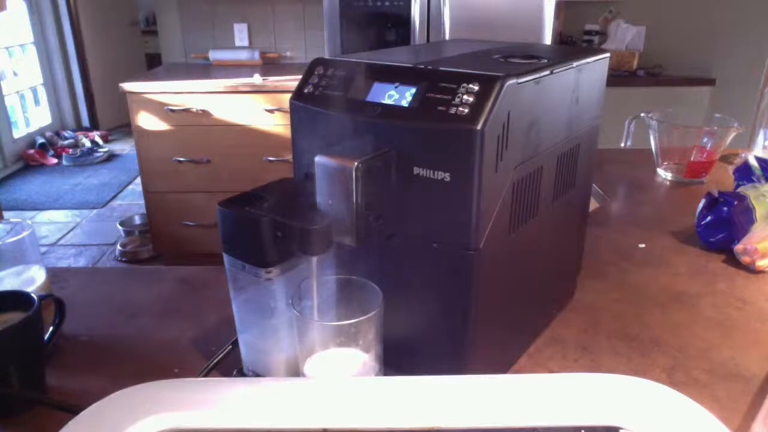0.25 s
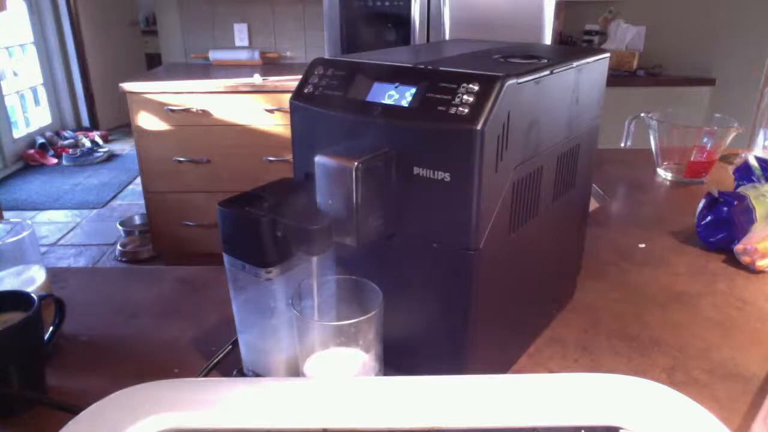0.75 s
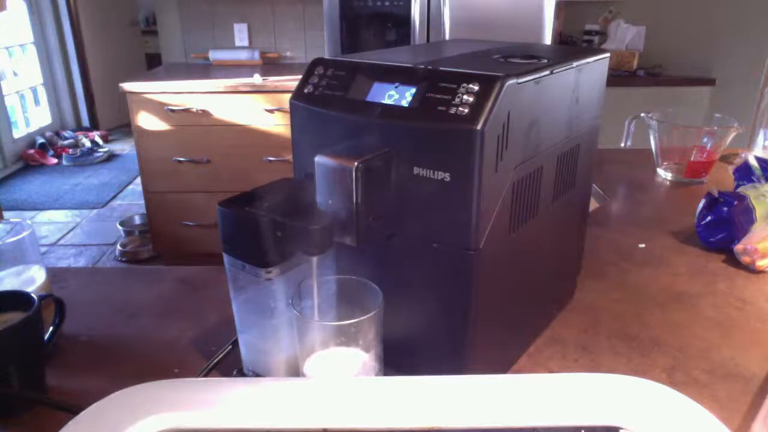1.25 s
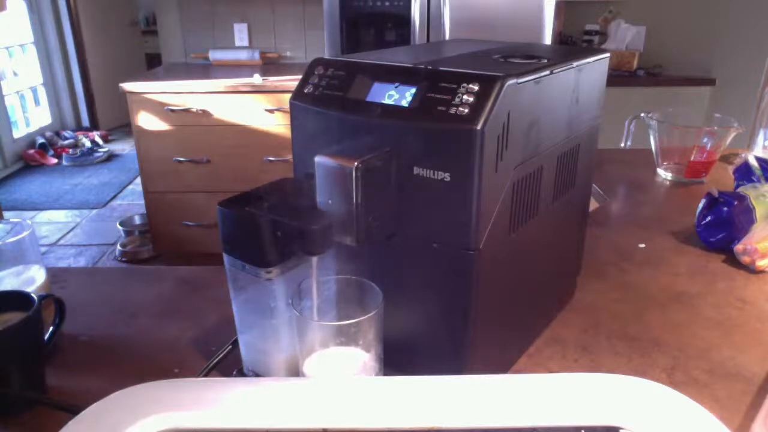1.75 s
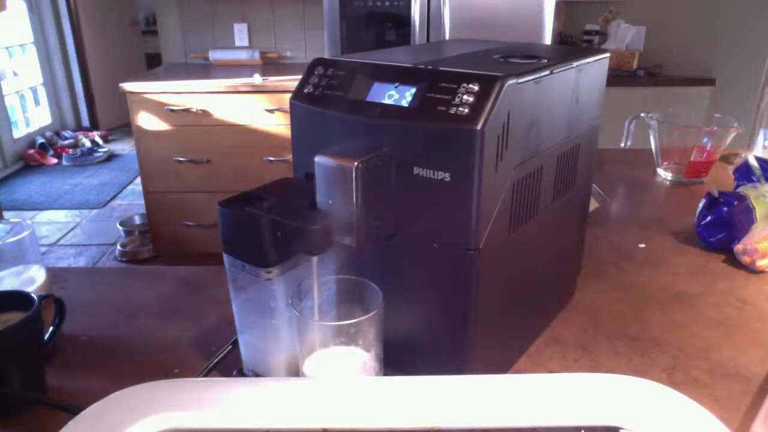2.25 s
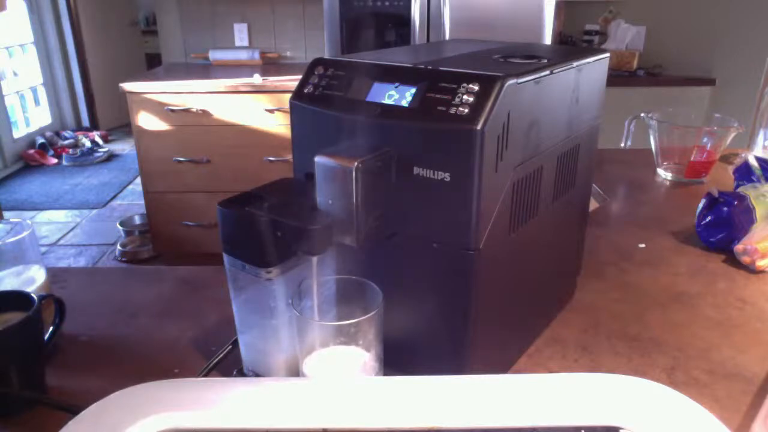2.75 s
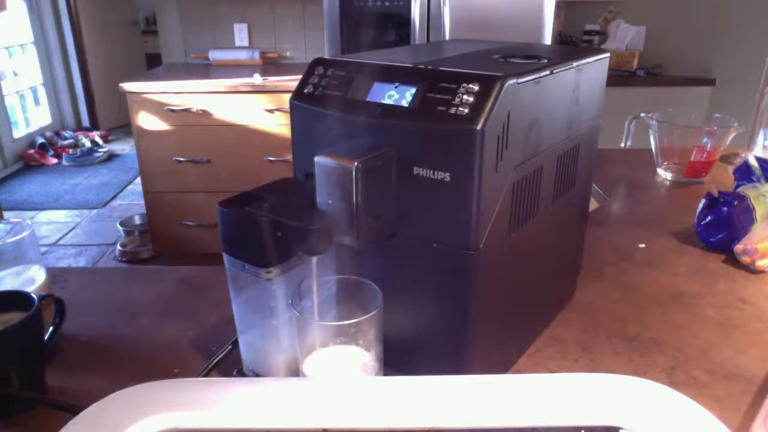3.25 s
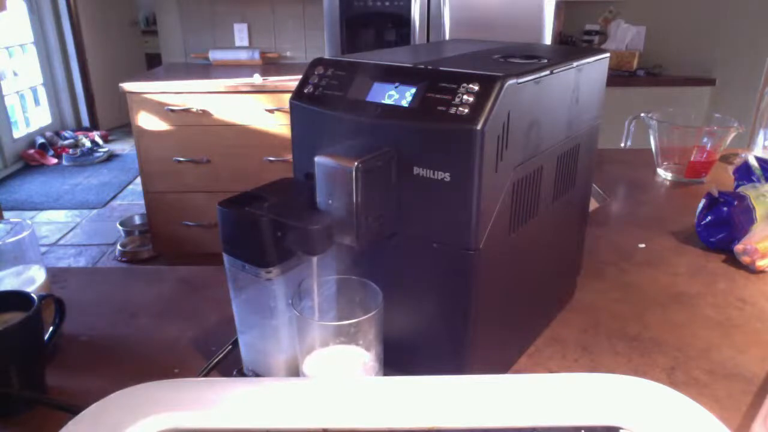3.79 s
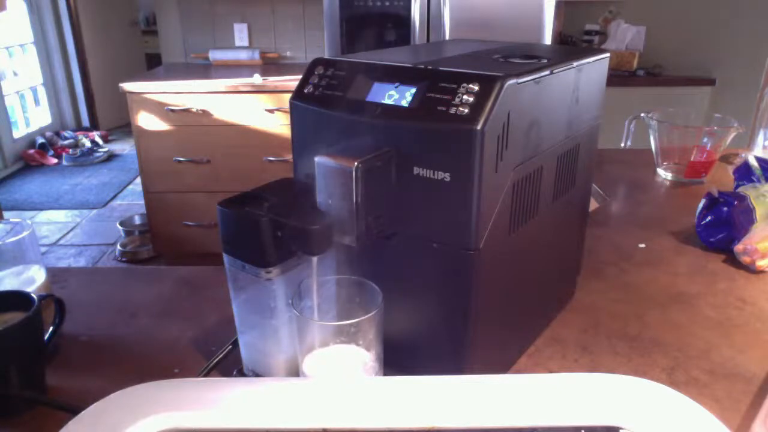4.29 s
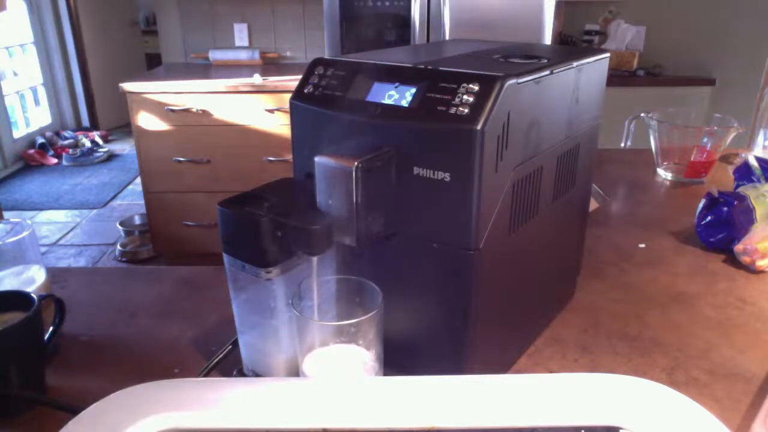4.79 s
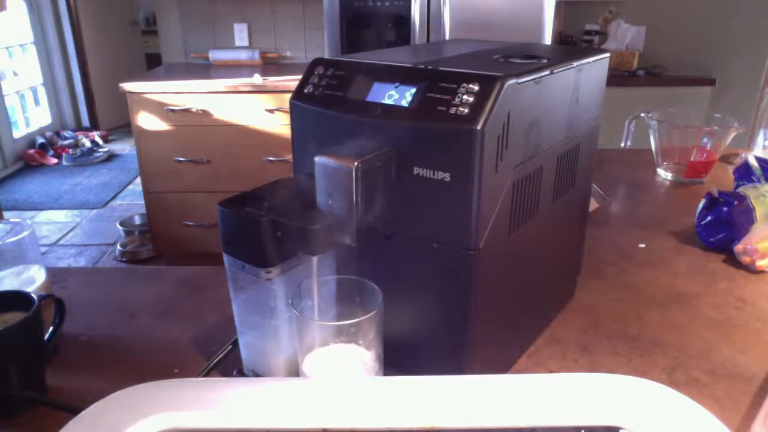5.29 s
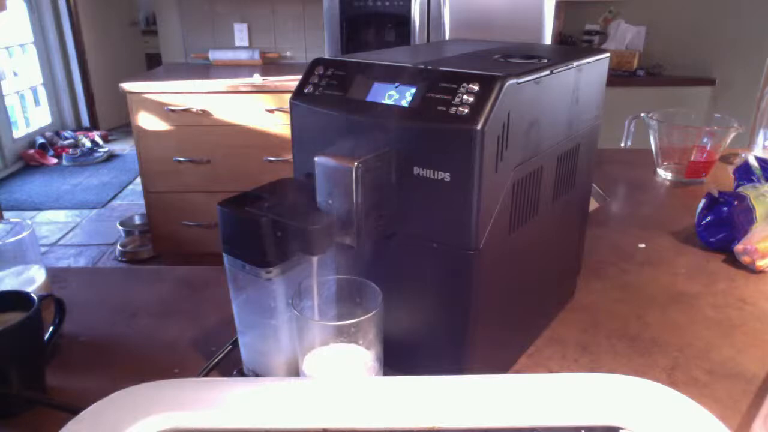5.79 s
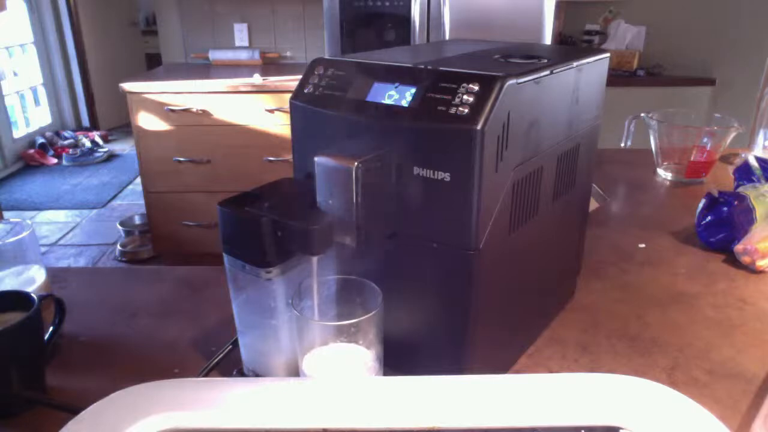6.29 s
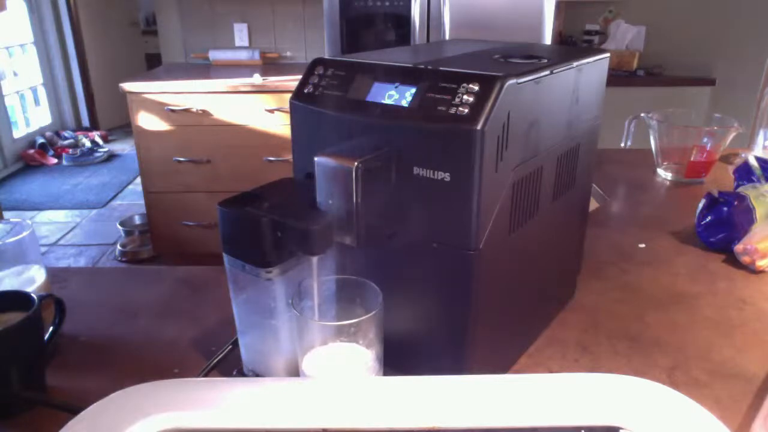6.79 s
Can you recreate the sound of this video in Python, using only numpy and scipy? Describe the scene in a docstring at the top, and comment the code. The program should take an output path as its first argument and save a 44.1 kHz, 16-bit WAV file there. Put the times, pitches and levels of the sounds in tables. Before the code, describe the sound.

Close in a small kitchen, an automatic coffee machine froths milk with a loud, dense steam roar centred in the upper mids, edged with rasp and sizzle. After about four seconds it eases, sputtering and choking, down to a much quieter, pulsing hiss. Milk gurgles faintly and a pump thuds softly three times a second.

```python
"""On a kitchen counter, an automatic coffee machine froths milk into a glass; the room answers briefly.
A noise jet and uneven kicks ring the frother's chamber as a roar, and rasp and sizzle at the spout.
Rising bubble tones gurgle in the milk and crackle in its foam. As the jet eases, it sputters more.
Behind it the water pump feeds the boiler: three soft thuds a second, buzzing through the casing."""
import sys
import numpy as np
from scipy import signal
from scipy.fft import rfft, irfft, next_fast_len
from scipy.io import wavfile
from scipy.ndimage import uniform_filter1d, map_coordinates

SR = 44100
rng = np.random.default_rng(int(sys.argv[2]) if len(sys.argv) > 2 else 0)


def generate_wav(sig):
    """Save sig (samples, or channels by samples) to the path in sys.argv[1] as 16-bit PCM at SR."""
    pcm = np.round(np.clip(np.atleast_2d(sig).T, -1, 1) * 32767).astype(np.int16)
    wavfile.write(sys.argv[1], SR, pcm)


N = 310464  # samples

# strength of the steam jet, heard as the chamber's roar: time_s [s], level_db [dB]
JET_STRENGTH = [(0, -15), (1.9, -17), (3.95, -18), (4.6, -20), (5.1, -23.5), (5.6, -27.5), (6.3, -29.5),
                (7.04, -31.5)]
# milk briefly blocks the jet, roar and spray change: centre_s [s], roar_change_db [dB], spray_change_db [dB]
MILK_CHOKES = [(4.335, -4, 0.5), (4.75, -6, 0.5), (5.285, -3.5, 1), (5.595, -5.5, 0), (5.77, -7, 2),
               (5.86, -3, 1), (6.6, 1.5, -1.5), (6.99, -4, -1)]
# spurts of steam through the chamber: centre_s [s], level_db [dB]
STEAM_SPURTS = [(4.385, -18), (4.7, -21), (5.05, -19), (5.35, -22), (5.675, -27.5), (5.725, -25.5),
                (5.81, -26.5), (5.935, -27.5), (6.12, -30), (6.41, -29.5), (6.775, -29)]
CHOKE_HALF_S, SPURT_HALF_S = 0.022, 0.02  # half the length of a choke and of a spurt
# the chamber's main resonance: pitch at rest, octaves that a surge of milk lowers it
THROAT_HZ, FLOOD_OCTAVES = 1624, 0.1
# what a surge adds to each sound when the jet is weak; a stronger jet hides it
ROAR_SURGE_DB, RASP_SURGE_DB, SIZZLE_SURGE_DB, GURGLE_SURGE_DB = 2, 0.5, 1.5, 1


def chamber(sputter, kicks, surge):
    """The jet and its collapsing pockets ring the chamber; a weak jet surges, chokes and spurts."""
    jet_db, = curves(JET_STRENGTH)
    choke_db = sum(db * bump(s, CHOKE_HALF_S) for s, db, _ in MILK_CHOKES)
    roar_db = jet_db + ROAR_SURGE_DB * surge + choke_db
    source = blend(jet(), kicks, 0.65 * sputter)
    ring = kitchen(frother(source, lo_hz=1241, hi_hz=2660), wet_db=-9.5)
    # each surge floods the chamber, and the jet tosses the milk level about quickly
    throat_hz = THROAT_HZ * 2 ** (-FLOOD_OCTAVES * surge + 0.12 * wobble(14))
    roar = churned(ring, patchy_db=0.77 + 3.8 * sputter,
                   centre_hz=throat_hz, octaves=0.072, lift_db=1.0 + 10 * sputter)
    # a steady jet wavers slowly, a sputtering one fast
    flutter_db = 1.1 * sputter * wobble(30) + 0.5 * (1 - sputter) * wobble(10)
    return np.hypot(amp(roar_db + flutter_db), puffs(STEAM_SPURTS, SPURT_HALF_S)) * roar


# large steam pockets bursting in the chamber: start_s [s], kick_db [dB, relative: see pops]
POCKET_BURSTS = [(5.045, -13), (6.774, -18.5)]


def pops():
    """A large pocket gives the chamber one hard kick."""
    kicks = np.zeros(N)
    for start_s, kick_db in POCKET_BURSTS:
        kicks[int(start_s * SR)] = amp(kick_db)
    ring = frother(kicks, lo_hz=1300, hi_hz=1860)
    # before the room, the loudest ring peaks 3 dB above the strongest kick
    peak = amp(3) * kicks.max()
    return kitchen(peak * ring / np.abs(ring).max(), wet_db=-11)


# the spray leaving the spout: time_s [s], rasp_db [dB], sizzle_db [dB]
SPOUT_SPRAY = [(0, -29.7, -24.5), (.7, -31, -28), (1.7, -30.5, -29), (2.1, -33, -31.5), (2.7, -35, -31),
               (3.15, -39, -35), (3.5, -34, -31.5), (4.35, -36, -31.5), (4.85, -42, -36), (5.35, -41, -40),
               (6.1, -46.5, -39.5), (7.04, -48, -49.5)]
# wet splutters at the spout: centre_s [s], rasp_db [dB], sizzle_db [dB], half_length_s [s]
WET_SPLUTTERS = [(2.604, -47, -29, 0.039), (4.07, -50, -33, 0.054), (4.26, -39, -27.5, 0.1),
                 (4.51, -55, -31, .035), (4.627, -36.5, -46, 0.047), (5.08, -37.5, -38, 0.077),
                 (5.48, -44, -38.5, .06), (5.96, -44, -44, 0.063), (6.07, -57, -46, 0.058),
                 (6.82, -43, -61, 0.028)]
# the sizzle's wandering band: its centre, and how much a splutter sharpens it
SIZZLE_HZ, SPLUTTER_LIFT_DB = 5240, 6


def spout_levels(surge):
    """Rasp and sizzle in dB from spray, surges, chokes, splutters; and the splutters' share of the sizzle."""
    rasp_db, sizzle_db = curves(SPOUT_SPRAY)
    choke_db = sum(db * bump(s, CHOKE_HALF_S) for s, _, db in MILK_CHOKES)
    wet_rasp = sum(amp(db) * bump(s, half_s) for s, db, _, half_s in WET_SPLUTTERS)
    wet_sizzle = sum(amp(db) * bump(s, half_s) for s, _, db, half_s in WET_SPLUTTERS)
    rasp = np.hypot(amp(rasp_db + RASP_SURGE_DB * surge), wet_rasp)
    sizzle = np.hypot(amp(sizzle_db + SIZZLE_SURGE_DB * surge), wet_sizzle)
    wetness = wet_sizzle / sizzle
    return 20 * np.log10(rasp) + choke_db, 20 * np.log10(sizzle) + choke_db, wetness


def spout(sputter, kicks, surge):
    """Wet steam rasps through the spout and sizzles at its lip in a wandering band."""
    rasp_db, sizzle_db, wetness = spout_levels(surge)

    rasp_source = blend(jet(), kicks, 0.18 * sputter)
    rasp = kitchen(frother(rasp_source, lo_hz=2745, hi_hz=4440), wet_db=-9.5)
    rasp = walls(rasp, share=0.097, reach_s=0.008)
    rasp = churned(rasp, patchy_db=0.4 + 6.6 * sputter, size=(4, 9))

    chirps = bubbles(rate=900, lo_hz=4443, hi_hz=7400, cycles=48, rise=0.019, spread_db=5.5)
    sizzle_source = blend(jet(), chirps, 0.25 * sputter)
    sizzle = kitchen(frother(sizzle_source, lo_hz=4370, hi_hz=7170), wet_db=-9.0)
    sizzle = walls(sizzle, share=0.091, reach_s=0.008)
    # splutters hold the band still and sharpen it
    centre_hz = SIZZLE_HZ * np.exp(0.15 * (1 - wetness) * wobble(12))
    lift_db = 5.8 * sputter + SPLUTTER_LIFT_DB * wetness
    sizzle = churned(sizzle, patchy_db=1.5 + 2.9 * sputter, size=(4, 8),
                     centre_hz=centre_hz, octaves=0.15, lift_db=lift_db)

    rasp_gain = amp(rasp_db + (0.83 + 2 * sputter) * wobble(20))
    sizzle_gain = amp(sizzle_db + 0.88 * sputter * wobble(20))
    return rasp_gain * rasp + sizzle_gain * sizzle


# brief whistles of steam at the lip of the spout: centre_s [s], level_db [dB]
LIP_WHISTLES = [(5.24, -34.5), (5.755, -38), (5.935, -30), (6.04, -37), (6.37, -32.5), (6.51, -39)]


def whistles():
    """For a moment the lip of the spout rings at its own pitch: a narrow band of steam noise."""
    tone = unit(coloured(jet(), lambda hz: band(hz, lo_hz=4780, hi_hz=4780, order=36)))
    return puffs(LIP_WHISTLES, half_s=0.015) * tone


# big glugs in the milk: centre_s [s], level_db [dB], pitch_hz [Hz], half_length_s [s]
MILK_GLUGS = [(2.85, -44, 800, .07), (3.566, -39.5, 600, .04), (3.76, -39, 740, 0.051),
              (3.857, -46, 1020, 0.051), (4.402, -47, 650, 0.055), (6.12, -51, 600, .04),
              (6.39, -45, 496, 0.087)]
# bubbling under the surface: level at full froth, dB per dB of froth
GURGLE_DB, GURGLE_FOLLOWS = -33.5, 1.04
# muffling as the glass fills, pitch of the jet's hollow
MUFFLE_DB_PER_S, HOLLOW_HZ = 0.81, 723


def gurgle(sputter, surge):
    """Big bubbles ring in the hollow under the jet, and the churning milk rumbles faintly."""
    froth_db, = curves(MILK_FROTH)
    muffle_db = MUFFLE_DB_PER_S * np.arange(N) / SR
    steady_db = GURGLE_DB + GURGLE_FOLLOWS * (froth_db - froth_db.max()) - muffle_db
    gurgle_db = steady_db + GURGLE_SURGE_DB * surge + 3.0 * sputter * wobble(11)
    # the hollow wanders in pitch; a big glug pulls it towards its own
    pull = sum(np.log(hz / HOLLOW_HZ) * bump(s, half_s) for s, _, hz, half_s in MILK_GLUGS)
    hollow_hz = HOLLOW_HZ * np.exp(0.059 * wobble(10) + pull)
    swell = sum(amp(db) * bump(s, half_s) for s, db, _, half_s in MILK_GLUGS)

    glugs = bubbles(rate=220, lo_hz=428.8, hi_hz=1145, cycles=17.1, rise=0.118, spread_db=3.5)
    ring = kitchen(frother(blend(jet(), glugs, 0.077), lo_hz=368, hi_hz=1180), wet_db=-6.5)
    ring = churned(ring, patchy_db=0.2 + 4.3 * sputter,
                   centre_hz=hollow_hz, octaves=0.76, lift_db=1.5 + 17.0 * sputter)

    def low_milk(hz):
        return band(hz, lo_hz=255, hi_hz=5000, order=2) * band(hz, lo_hz=25, hi_hz=436, order=5)

    rumble = unit(coloured(jet(), low_milk))
    # only a strong, steady jet stirs the whole glass
    rumble_db = gurgle_db - 14.5 - 9.7 * sputter + 1.2 * wobble(22.15)
    return np.hypot(amp(gurgle_db), swell) * ring + amp(rumble_db) * rumble


# how hard the milk is whipped, heard as the fizz of its foam: time_s [s], level_db [dB]
MILK_FROTH = [(0, -36.5), (.9, -37.5), (1.72, -37.5), (1.96, -42), (2.06, -42), (2.65, -42.5), (3.2, -45),
              (3.75, -43.5), (4.4, -43), (4.7, -45), (6.4, -48), (7.04, -49)]
# puffs of fine droplets: centre_s [s], level_db [dB]
DROPLET_SPITS = [(1.5, -45), (3.8, -39), (5.925, -45), (6.125, -49)]


def foam(sputter, kicks):
    """Tiny bubbles burst in the foam under a mist of droplets, with a few sharper spits."""
    fizz_db, = curves(MILK_FROTH)
    crackle = bubbles(rate=1500, lo_hz=6800, hi_hz=15100, cycles=2.5, rise=0.05, spread_db=25)
    mist = blend(jet(), kicks, 0.03 * sputter)
    fizz = kitchen(frother(blend(mist, crackle, 0.11), lo_hz=7790, hi_hz=17600), wet_db=-8.5)
    fizz = walls(fizz, share=0.047, reach_s=0.0083)
    fizz = churned(fizz, patchy_db=1.5 + 1.5 * sputter, size=(12, 6))
    spray = unit(coloured(jet(), lambda hz: band(hz, lo_hz=10500, hi_hz=15500, order=5)))
    fizz_gain = amp(fizz_db + 0.75 * wobble(60) + 0.34 * wobble(10))
    return fizz_gain * fizz + puffs(DROPLET_SPITS, half_s=0.017) * spray


# the pump's beat: time of the first stroke, strokes a second
FIRST_STROKE_S, STROKES_PER_S = 0.023, 3
# a stroke's level at full steam, its dB per dB of the jet, its scatter
STROKE_DB, STROKE_FOLLOWS, STROKE_SCATTER_DB = -36.5, 0.33, 0.3


def stroke_times():
    """The pump's regular beat, in seconds."""
    return np.arange(FIRST_STROKE_S, N / SR, 1 / STROKES_PER_S)


# the casing that the pump shakes: pitch_hz [Hz], width_hz [Hz], level_db [dB, relative]
CASING_MODES = [(138, 11, -16), (165, 24, -5.5), (208, 28, -41), (300.5, 65, 3)]


def pump(swell_s=0.013, buzz_hz=139, wet_db=-7):
    """Each stroke is a short buzz of the piston, mixed with a rattle of the casing."""
    t = np.arange(-SR // 10, SR // 10) / SR
    hz = np.fft.rfftfreq(len(t), 1 / SR)
    ring = sum(amp(db) / (1 + (2 * (hz - pitch) / width) ** 2) for pitch, width, db in CASING_MODES)
    casing = ring + amp(-16) * band(hz, lo_hz=110, hi_hz=423, order=3)
    out = np.zeros(N + 2 * SR)  # a second of margin at both ends
    jet_db, = curves(JET_STRENGTH)
    for s in stroke_times():
        follow_db = STROKE_FOLLOWS * (jet_db[int(s * SR)] - jet_db.max())
        level_db = STROKE_DB + follow_db + STROKE_SCATTER_DB * rng.standard_normal()
        # the piston slows as the pressure builds, so the buzz sags
        sag = 1 - 0.08 * np.tanh(t / swell_s)
        pitch_hz = buzz_hz * (1 + 0.02 * rng.standard_normal()) * sag
        phase = 2 * np.pi * (np.cumsum(pitch_hz) / SR + rng.random())
        rattle = unit(irfft(rfft(rng.standard_normal(len(t))) * casing, len(t)))
        buzz = unit(0.19 * np.sin(phase) + np.sin(2 * phase))
        stroke = blend(rattle, buzz, 0.51) * np.exp(-(t / swell_s) ** 2 / 2)
        # every stroke gets the energy its level asks for
        stroke *= np.sqrt(np.pi * swell_s * SR / np.sum(stroke ** 2))
        first = int((s + t[0]) * SR) + SR
        out[first:first + len(t)] += amp(level_db) * stroke
    return kitchen(out[SR:][:N], wet_db)


# each stroke's water flashes into a surge of steam: delay of the crest, rise, fall
SURGE_LAG_S, SURGE_ATTACK_S, SURGE_RELEASE_S = 0.019, 0.026, 0.16


def surges():
    """Steam swells after every pump stroke; the weaker the jet, the more it shows."""
    t = np.arange(N) / SR
    swell = np.zeros(N)
    for crest_s in stroke_times() + SURGE_LAG_S:
        width_s = np.where(t < crest_s, SURGE_ATTACK_S, SURGE_RELEASE_S)
        swell += np.exp(-((t - crest_s) / width_s) ** 2)
    jet_db, = curves(JET_STRENGTH)
    weakness = 1 - amp(jet_db - jet_db.max())
    return (swell - swell.mean()) * weakness


def jet():
    """Turbulent steam: white noise, rms 1."""
    return rng.standard_normal(N)


def collapses(rate, wander, scatter_db):
    """Steam pockets condense in the cold milk, one kick each, at an uneven fast rate; rms 1."""
    turns = np.cumsum(rate * np.exp(wander * wobble(70))) / SR
    at = np.flatnonzero(np.diff(np.floor(turns)))
    kicks = np.zeros(N)
    kicks[at] = amp(scatter_db * rng.standard_normal(len(at)))
    return unit(kicks)


def bubbles(rate, lo_hz, hi_hz, cycles, rise, spread_db):
    """Damped tones that climb in pitch as each bubble nears the surface; rate a second, rms 1."""
    when, pitch, size, life = rng.random((int(rate * N / SR), 4)).T[:, :, None]
    hz = lo_hz * (hi_hz / lo_hz) ** pitch
    k = np.arange(int(3 * cycles / lo_hz * SR))
    span = cycles * (0.5 + life)
    age = hz * k / SR / span  # 1 after span cycles at the starting pitch
    envelope = amp(spread_db * size) * np.exp(-2 * age) * (1 - np.exp(-20 * age))
    tone = envelope * np.sin(2 * np.pi * span * age * (1 + rise * age / 2))
    place = (when * N).astype(int) + k
    return unit(np.bincount(place.ravel(), tone.ravel(), N)[:N])


# broad colour of the steam: pitch_hz [Hz], level_db [dB, relative]
STEAM_COLOUR = [(400, -35), (900, -27.5), (1200, -12), (1420, -0.5), (1750, -2.5), (2050, -11),
                (2220, -20.5), (2750, -28), (3300, -28.5), (5200, -25), (7900, -34.5), (11300, -26.5),
                (12200, -38.5), (15500, -35)]
# resonances of the frother, spout and glass: pitch_hz [Hz], width_hz [Hz], lift_db [dB]
CAVITY_MODES = [(487.6, 29, 12.5), (555, 53, 7.5), (658, 76, 7), (802.5, 48, 10), (1128, 65, 6.5),
                (1466.5, 63, 5.5), (1654, 44, 6.5), (1826, 235, 5.5), (2018, 97, 4.5), (2364, 98, 10.5),
                (2455, 100, 8.5), (2534, 73, 15.5), (3087, 360, 14), (3372, 253, 15), (3583, 130, 8.5),
                (3942, 200, 13.5), (4207, 180, 7), (4778, 280, 11.5), (4950, 370, 5.5), (5260, 250, 8.5),
                (5710, 255, 11.5), (6100, 154, 8), (6420, 170, 6.5), (7150, 770, 13.5)]


def frother(x, lo_hz, hi_hz):
    """One range of the frother's resonances, rung by x; rms 1."""
    grid = np.linspace(0, SR / 2, 4096)
    lift_db = sum(db / (1 + (2 * (grid - pitch) / width) ** 2) for pitch, width, db in CAVITY_MODES)
    gain = amp(along(STEAM_COLOUR, grid) + lift_db) * band(grid, lo_hz, hi_hz)
    return unit(coloured(x, lambda hz: np.interp(hz, grid, gain)))


def churned(x, patchy_db, size=(3, 10), centre_hz=None, octaves=0.2, lift_db=0):
    """Moving foam shifts the colour of x in random patches and, if given, under one gliding resonance."""
    hz, _, z = signal.stft(x, SR, nperseg=1024, noverlap=768)

    def frames(curve):
        return np.interp(np.linspace(0, N, z.shape[1]), np.arange(N), curve + np.zeros(N))

    # size: patch extent in frequency bins and in frames
    field = uniform_filter1d(rng.standard_normal(z.shape), size[0], 0)
    field = uniform_filter1d(field, size[1], 1)
    db = frames(patchy_db) * unit(field)
    if centre_hz is not None:
        distance = np.log2((hz[:, None] + 1) / frames(centre_hz)) / octaves
        db = db + frames(lift_db) / (1 + distance ** 2)
    # the colour moves, the power stays
    gain = amp(db)
    power = np.mean(np.abs(z) ** 2, axis=1)
    gain = gain / np.sqrt(power @ gain ** 2 / power.sum())
    return unit(signal.istft(z * gain, nperseg=1024, noverlap=768)[1][:N])


def walls(x, share, reach_s, count=8):
    """Weak copies from the counter and the machine's front comb the hiss; rms 1."""
    out = x.copy()
    for delay, sign in rng.random((count, 2)):
        lag = 1 + int(reach_s * (0.2 + delay) * SR)
        out[lag:] += share * np.sign(sign - 0.5) * x[:-lag]
    return unit(out)


# decay of the kitchen: pitch_hz [Hz], t60_s [s]
KITCHEN_DECAY = [(200, 0.21), (2000, 0.26), (12000, 0.3)]


def kitchen(x, wet_db):
    """The direct sound and the short answer of the room, a decaying noise tail, at unchanged power."""
    hz, t, z = signal.stft(rng.standard_normal(SR // 3), SR, nperseg=256)
    decay_db = -60 * t / along(KITCHEN_DECAY, hz)[:, None]
    tail = signal.istft(z * amp(decay_db), SR, nperseg=256)[1]
    wet = signal.fftconvolve(x, tail / np.linalg.norm(tail))[:N]
    return (x + amp(wet_db) * wet) / np.hypot(1, amp(wet_db))


def amp(db):
    """Decibels to gain."""
    return 10 ** (np.asarray(db) / 20)


def unit(x):
    """Scale to rms 1."""
    return x / np.sqrt(np.mean(x ** 2) + 1e-20)


def along(points, hz):
    """Interpolate (Hz, value) points on a log frequency axis."""
    f, v = np.transpose(points)
    return np.interp(np.log(hz + 1), np.log(f + 1), v)


def curves(rows):
    """One value per sample for each column after the time."""
    s, *cols = np.transpose(rows)
    return [np.interp(np.arange(N) / SR, s, c) for c in cols]


def wobble(rate):
    """A smooth random curve, rate knots a second."""
    knots = rng.standard_normal(int(N * rate / SR) + 4)
    return map_coordinates(knots, [np.arange(N) * rate / SR])


def bump(s, half_s):
    """A smooth swell of height 1 around time s, down to 1/e at half_s either side."""
    return np.exp(-((np.arange(N) / SR - s) / half_s) ** 2)


def puffs(rows, half_s):
    """Gain of short, smooth bursts at the given (s, dB)."""
    return sum(amp(db) * bump(s, half_s) for s, db in rows)


def blend(a, b, share):
    """Equal-power mix with the given share of b."""
    share = np.clip(share, 0, 1)
    return np.sqrt(1 - share) * a + np.sqrt(share) * b


def band(hz, lo_hz, hi_hz, order=18):
    """Gain of a band with rounded edges, steeper for a higher order."""
    return 1 / np.sqrt((1 + (lo_hz / (hz + 1)) ** (2 * order)) * (1 + (hz / hi_hz) ** (2 * order)))


def coloured(x, gain):
    """Causal (minimum-phase) filter with the given gain of frequency."""
    m = 2 * next_fast_len(N // 2 + SR // 4)
    log_gain = np.log(np.maximum(gain(np.fft.rfftfreq(m, 1 / SR)), 1e-6))
    # folding the cepstrum onto positive times makes the filter causal
    cepstrum = irfft(log_gain, m)
    cepstrum[1:m // 2] *= 2
    cepstrum[m // 2 + 1:] = 0
    return irfft(rfft(x, m) * np.exp(rfft(cepstrum)), m)[:N]


# the jet grows steadily more unsteady: share of sputter (0-1) at first, and its growth
SPUTTER_START, SPUTTER_PER_S = 0.1, 0.069


def scene():
    """The same collapsing pockets and pump surges drive the frother: pockets in chamber, spout and foam."""
    sputter = SPUTTER_START + SPUTTER_PER_S * np.arange(N) / SR
    surge = surges()
    kicks = collapses(rate=150, wander=0.35, scatter_db=2)
    steam = chamber(sputter, kicks, surge) + pops() + spout(sputter, kicks, surge) + whistles()
    milk = gurgle(sputter, surge) + foam(sputter, kicks)
    return (steam + milk + pump())[None]


TOP_HZ = 15700  # upper limit of the microphone


def record(dry):
    """The microphone passes nothing at or above its band limit."""
    m = next_fast_len(N + SR // 2)
    passed = np.fft.rfftfreq(m, 1 / SR) < TOP_HZ
    return irfft(rfft(dry, m) * passed, m)[..., :N]


dry = scene()
out = record(dry)
generate_wav(out)
```